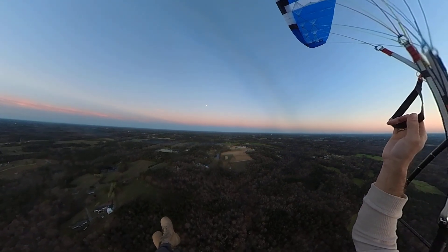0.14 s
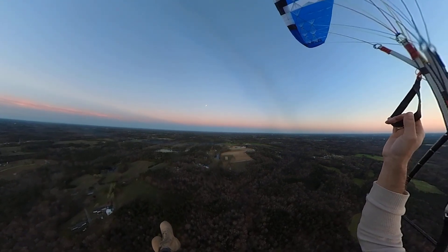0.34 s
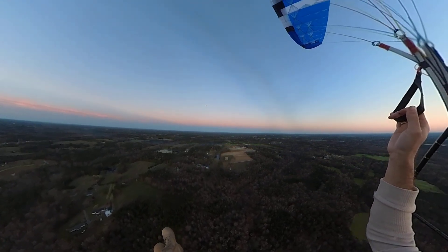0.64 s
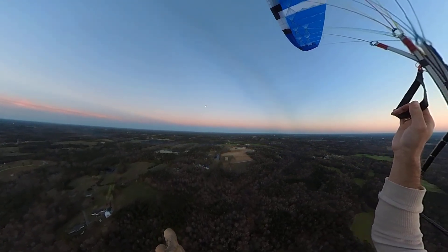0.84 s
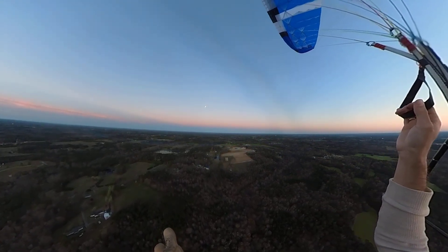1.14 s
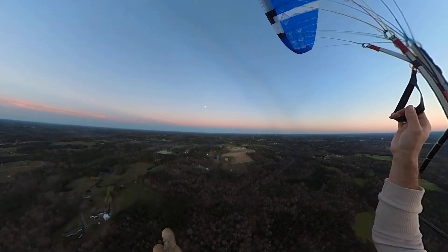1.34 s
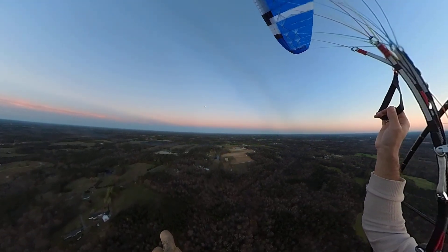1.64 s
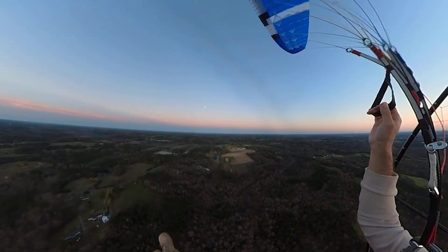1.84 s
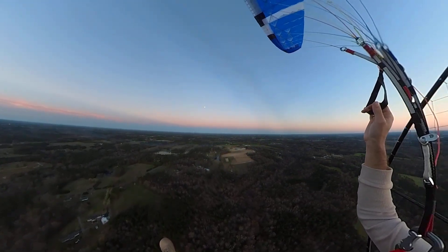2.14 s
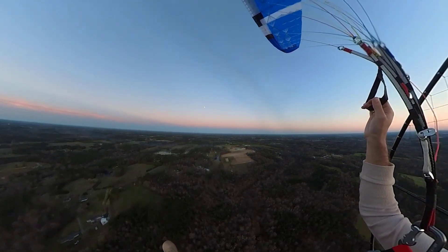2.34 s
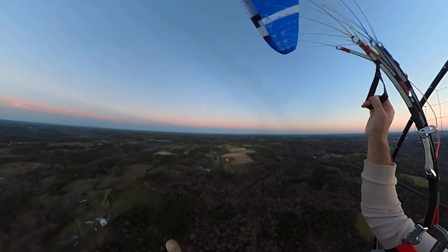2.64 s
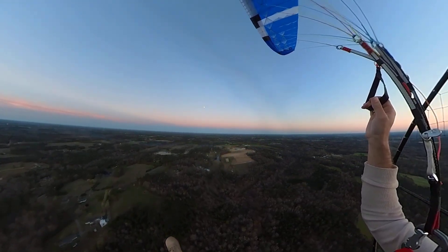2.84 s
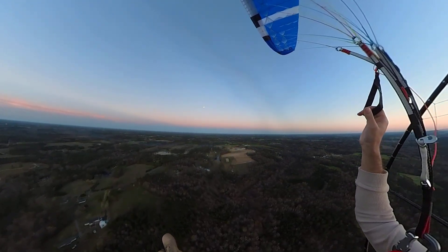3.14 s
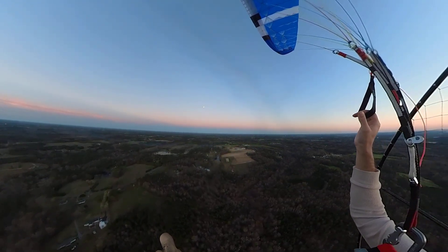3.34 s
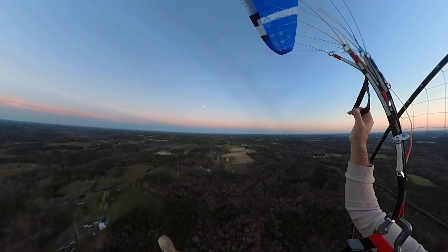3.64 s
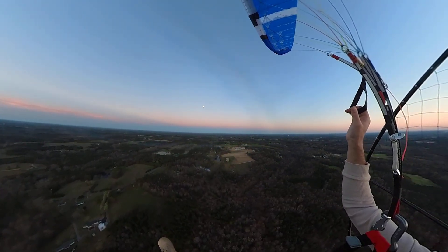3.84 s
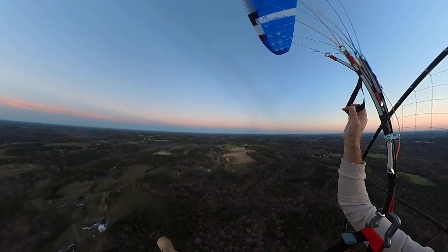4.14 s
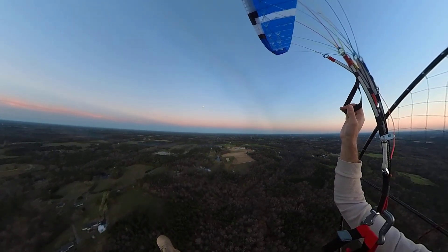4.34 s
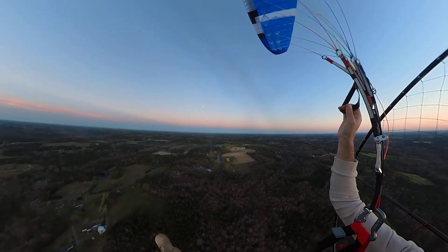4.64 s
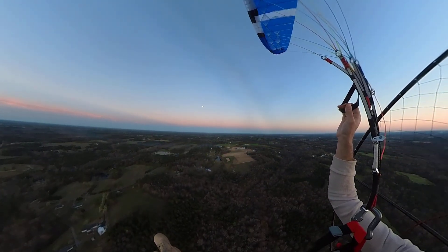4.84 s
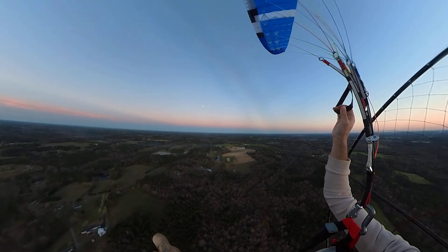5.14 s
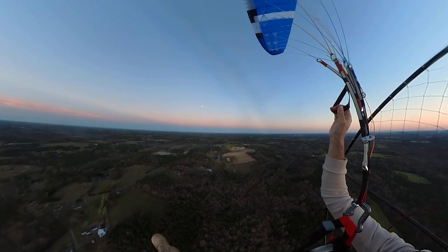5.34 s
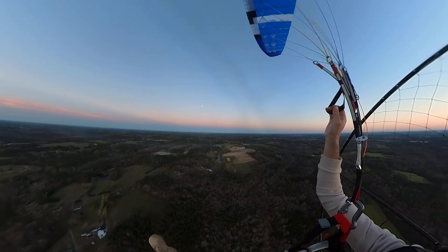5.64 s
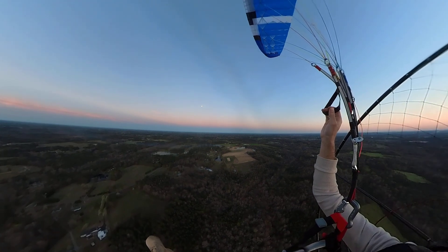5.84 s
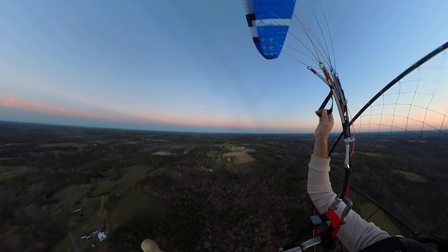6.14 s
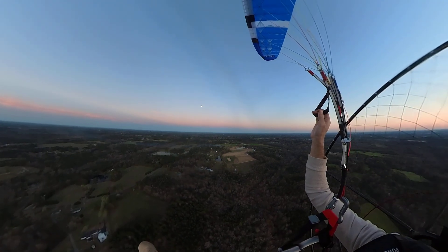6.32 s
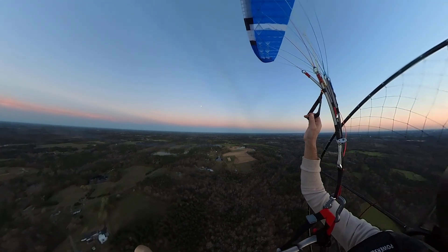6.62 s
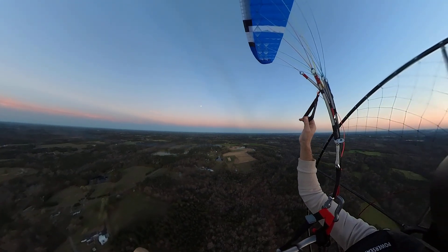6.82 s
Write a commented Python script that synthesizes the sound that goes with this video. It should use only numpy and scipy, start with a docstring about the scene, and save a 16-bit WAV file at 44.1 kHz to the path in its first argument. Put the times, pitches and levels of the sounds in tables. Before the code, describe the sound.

Close outdoor sound from the pilot's seat of an electric powered paraglider, dry and without echo. From 0 s a loud three-blade propeller drones, a low hum near 75 Hz with buzzing overtones and a fast throb of about 25 beats a second. Around it the wake roars, with soft pulsing swish and thin hiss. The airflow swells toward 1.5 s while low buffeting grows. Between 1.3 and 1.75 s the motor eases and the pitch slides down by about two semitones; around 1.6 s a very short rasp of wind brightens and turns hollow as the bass drops out. From 1.8 s the cruise drone is steady, with slight flutter and faint singing tones in the wake. At about 5.7 to 6.0 s the bass thins again beneath a hollow, lumpy rush with barely audible high ticks. Full bass then returns, briefly heavier, and the steady drone continues to the end, near 7 s.

```python
"""Open air, from the pilot's seat of an electric paramotor: a three-blade propeller hums and throbs once a
turn as a sum of shaft harmonics, and slows to cruise between 1.3 and 1.75 s. Its wake roars as shaped noise,
swelling in one gust; a fine hiss is gated by the pressure waves, most sharply once a turn, over low buffeting.
Twice the bass thins out briefly: first under a short rasp of swept noise, later under a hollow roar of
noise surges with faint ringing ticks."""
import sys
import numpy as np
from scipy import signal
from scipy.fft import rfft, irfft, next_fast_len
from scipy.io import wavfile
from scipy.ndimage import map_coordinates

SR = 44100
rng = np.random.default_rng(int(sys.argv[2]) if len(sys.argv) > 2 else 0)


def output_pcm(signal):
    """Save a mono or channel-first signal as 16-bit PCM at the path in sys.argv[1].

    Samples are clipped to [-1, 1] before scaling.
    """
    pcm = np.clip(np.atleast_2d(signal).T, -1, 1) * 32767
    wavfile.write(sys.argv[1], SR, np.round(pcm).astype(np.int16))


N = 307818


def amp(db):
    """Logarithmic level: decibels to amplitude gain."""
    return 10 ** (np.asarray(db) / 20)


def unit(x):
    """Power normalisation: scales to rms 1."""
    return x / np.sqrt(np.mean(x ** 2) + 1e-20)


def curves(rows):
    """Linear interpolation: one value per sample for each column after the time."""
    seconds, *columns = np.transpose(rows)
    return [np.interp(np.arange(N) / SR, seconds, column) for column in columns]


def wobble(rate):
    """Band-limited fluctuation: a smooth random curve with rate knots a second."""
    knots = rng.standard_normal(int(N * rate / SR) + 4)
    return map_coordinates(knots, [np.arange(N) * rate / SR])


def ramp(start, length):
    """Linear transition: rises from 0 to 1 over length seconds."""
    return np.clip((np.arange(N) / SR - start) / length, 0, 1)


def surge(peak, rise, fall):
    """Exponential growth and decay: reaches 1 at the peak time, with time constants in seconds."""
    t = np.arange(N) / SR - peak
    return np.exp(-np.maximum(-t / rise, t / fall))


def filtered(x, response):
    """Linear filtering: multiplies the spectrum by a response of frequency."""
    size = next_fast_len(N + 8192)
    return irfft(rfft(x, size) * response(np.fft.rfftfreq(size, 1 / SR)), size)[:N]


def noise(spectrum, gate=1):
    """Amplitude-modulated random noise, coloured by (frequency, level) points and scaled to rms 1."""
    hz, db = np.transpose(spectrum)
    colour = lambda f: amp(np.interp(np.log(f + 1), np.log(hz), db, right=-120))
    return unit(filtered(gate * rng.standard_normal(N), colour))


def dulled(x, edge_hz):
    """Low-pass filtering: removes the top above edge_hz and scales to rms 1."""
    return unit(filtered(x, lambda hz: 1 / (1 + (hz / edge_hz) ** 6)))


def swept(x, centre_hz, octaves):
    """Moving resonance: a log-frequency bell slides over the noise, its level compensated."""
    hz, t, z = signal.stft(x, SR, nperseg=512)
    centre = np.interp(t, np.arange(N) / SR, centre_hz)
    gain = np.exp(-0.5 * (np.log2((hz[:, None] + 1) / centre) / octaves) ** 2)
    mean_power = np.mean(np.abs(z) ** 2, axis=1, keepdims=True)
    passed_share = np.sum(mean_power * gain ** 2, axis=0) / mean_power.sum()
    return signal.istft(z * gain / np.sqrt(passed_share), SR, nperseg=512)[1][:N]


CRUISE_HZ, HIGH_HZ = 22.99, 25.82  # shaft turns a second at cruise and at high power
EASE_START_S, EASE_S, UNDERSHOOT_HZ, SETTLE_S = 1.275, 0.475, 0.18, 0.1


def shaft_speed():
    """Rotor deceleration: slows ever faster, dips just under cruise speed, then relaxes exponentially."""
    t = np.arange(N) / SR - EASE_START_S
    drop_hz = HIGH_HZ - CRUISE_HZ + UNDERSHOOT_HZ
    slowing = HIGH_HZ - drop_hz * np.clip(t / EASE_S, 0, 1) ** 2
    settling = UNDERSHOOT_HZ * (1 - np.exp(-np.maximum(t - EASE_S, 0) / SETTLE_S))
    return slowing + settling


def power_of(speed):
    """Motor power inferred linearly from shaft speed: 0 at cruise, 1 at high power."""
    return np.clip((speed - CRUISE_HZ) / (HIGH_HZ - CRUISE_HZ), 0, 1)


START_TURN = 0.828  # shaft position at time zero [turns]


def shaft_angle(speed, wander, jitter):
    """Phase is integrated speed [rad]: the load wanders slowly and uneven inflow nudges each passage."""
    turned = 2 * np.pi * (START_TURN + np.cumsum(speed) / SR)
    return turned + wander * wobble(3) + jitter * wobble(30)


def gust_swell():
    """Exponential gust: builds slowly at high power and dies as the motor eases off."""
    return surge(peak=1.5, rise=0.55, fall=0.38)


# Multiples of the shaft speed: every third is a blade tone, other whole ones come from unequal blades;
# a stray tone just under the fifteenth makes it beat: order [cycles per turn]
HARMONIC_ORDERS = [*range(1, 13), 14.5, *range(15, 55, 3), 56, *range(57, 73, 3)]
# Strength of each order, relative to tone_db: (level at high power [dB], level at cruise [dB])
HARMONIC_LEVELS = [(-42, -54), (-37.5, -58), (-23, -24.5), (-35.5, -31), (-55.5, -49), (-45, -31),
                   (-39, -38.5), (-47, -42), (-37, -50.5), (-38.5, -44.5), (-46, -51), (-40.5, -35.5),
                   (-61.5, -43.5), (-33.5, -34.5), (-37, -40), (-45, -44.5), (-39.5, -42.5), (-41.5, -41.5),
                   (-43, -45), (-47.5, -52), (-46.5, -51.5), (-45.5, -49.5), (-50.5, -53.5), (-63.5, -70),
                   (-54.5, -55.5), (-54, -54.5), (-57, -68), (-65.5, -63.5), (-59, -74), (-57, -68),
                   (-64.5, -61.5), (-59, -66), (-66, -70), (-65, -69.5)]
# Tones that stand out of the hum while the bass is thin: {order: lift [dB]}
THIN_BASS_LIFTS = {9: 16, 12: 2.9, 15: 4.4, 21: 6.3, 48: 11, 51: 2.8, 66: 4.8, 72: 7.7}
# Tones that swell with the gust and carry the downward glide: {order: lift [dB]}
GUST_TONE_LIFTS = {15: 4, 18: 1.7, 24: 0.91}
FLUTTER_CALM = 0.81  # share of the flutter that high power takes away


def propeller(angle, power, flutter_db, skew, bend, uneven, tone_db, smear, scatter_order):
    """Harmonic synthesis of blade pressure: a lopsided swell per blade, with a buzz of higher orders on top."""
    thin = sum(thin_spell(start, end) for start, end, *_ in BASS_SPELLS)
    gust = gust_swell()
    pressure = np.zeros(N)
    for order, (high_db, cruise_db) in zip(HARMONIC_ORDERS, HARMONIC_LEVELS):
        # long waves add up to a peaked swell; shorter ones get phases that bend with order
        # and scatter at random, and their levels flutter
        scatter = min(order / scatter_order, 2)
        phase = skew - bend * np.log(order) - smear * max(order - 9, 0) ** 2
        phase += scatter ** 2 * rng.standard_normal()
        between_blades = order % 3 > 0
        phase += uneven * between_blades  # the blades differ in timing as well as in strength
        flutter = flutter_db * min(scatter, 1) * (1 - FLUTTER_CALM * power) * wobble(15)
        level_db = tone_db + cruise_db + power * (high_db - cruise_db)
        level_db = level_db + thin * THIN_BASS_LIFTS.get(order, 0) + gust * GUST_TONE_LIFTS.get(order, 0)
        pressure -= amp(level_db + flutter) * np.sin(order * angle + phase)
    return pressure


def pumping(pressure, smooth_hz, drive, lean):
    """Pressure gradients drive the air to and fro, harder one way; the strongest pushes saturate. Rms 1."""
    slope = unit(filtered(np.gradient(pressure), lambda hz: 1 / (1 + (hz / smooth_hz) ** 4)))
    return unit(np.tanh(drive * np.abs(slope + lean)))


STRONG_BLADE_TURN = 0.34  # shaft position of the harder puff [turns]


def strong_blade(angle, sharpness, scatter_db):
    """Periodic modulation: once a turn one blade throws a harder puff, never twice the same."""
    puff = np.exp(sharpness * (np.cos(angle - 2 * np.pi * STRONG_BLADE_TURN) - 1))
    return puff * amp(scatter_db * wobble(29))


# Spectral shapes of the three airflow bands: (frequency [Hz], relative density [dB per Hz])
WAKE_SPECTRUM = [(40, -11.5), (80, 0.3), (160, -5), (260, -5), (420, -11), (700, -13), (1100, -19),
                 (1600, -24.5), (2500, -34), (4000, -53)]
SWISH_SPECTRUM = [(400, -19.5), (900, 1), (1500, -1.5), (2100, -7.5), (2700, -6), (3300, -15), (4000, -24),
                  (4900, -33.5), (6000, -50)]
HISS_SPECTRUM = [(3500, -28.5), (4900, -25), (5500, -13), (6200, -5), (7000, -0.5), (7900, -2), (8400, -10),
                 (9000, -22.5), (9400, -54.5)]
# what the gust and the high power add to each band
WAKE_GUST_DB, SWISH_GUST_DB, HISS_GUST_DB = 3, 7, 5
WAKE_POWER_DB, SWISH_POWER_DB, HISS_POWER_DB = 0.3, -2.5, -2.5
BODY_HZ, BODY_POWER_DB = 302, -2  # at high power the low end of the wake recedes


def airflow(push, accent, power, wake_db, swish_db, hiss_db, wake_depth, swish_floor, hiss_floor,
            puff_db, swish_accent, hiss_accent):
    """Modulated turbulence noise of the wake; its upper bands come in puffs, with every push of air."""
    gust, eddies = gust_swell(), wobble(11)
    wake_gain = amp(wake_db + WAKE_GUST_DB * gust + WAKE_POWER_DB * power + 0.79 * wobble(8))
    swish_gain = amp(swish_db + SWISH_GUST_DB * gust + SWISH_POWER_DB * power + 1.1 * eddies)
    hiss_gain = amp(hiss_db + HISS_GUST_DB * gust + HISS_POWER_DB * power + 0.53 * eddies)
    puffs = unit(push * amp(puff_db * wobble(90)))  # no two puffs are equally strong
    wake = wake_gain * noise(WAKE_SPECTRUM, 1 + wake_depth * puffs)
    body = filtered(wake, lambda hz: 1 / (1 + (hz / BODY_HZ) ** 4))
    wake = wake + (amp(BODY_POWER_DB * power) - 1) * body
    swish = swish_gain * noise(SWISH_SPECTRUM, swish_floor + puffs + swish_accent * accent)
    hiss = hiss_gain * noise(HISS_SPECTRUM, hiss_floor + puffs + hiss_accent * accent)
    return wake + swish + hiss


# Spectral shape of the low buffeting: (frequency [Hz], relative density [dB per Hz])
BUFFET_SPECTRUM = [(10, -19.5), (22, -0.5), (32, -1.5), (48, 1), (70, -10), (110, -2), (250, -42.5)]
# Course of the buffeting, relative to level_db: (time [s], level [dB])
BUFFET_COURSE = [(0.0, -49.5), (1.37, -35), (4.16, -43), (5.22, -39), (5.43, -36.5), (5.6, -37.5)]


def wind(level_db, gust_db):
    """Low-frequency turbulence noise: the airstream buffets with a slowly varying strength."""
    strength_db, = curves(BUFFET_COURSE)
    return amp(level_db + strength_db) * unit(amp(gust_db * wobble(5.5)) * noise(BUFFET_SPECTRUM))


# Narrow resonances that sing in the wake: (centre [Hz], width [Hz], level [dB])
WAKE_RESONANCES = [(407.6, 43, -55.5), (742.6, 20, -52.5), (1161, 29, -56.5)]


def rings():
    """Resonant filtering: noise through narrow peaks makes unsteady tones."""
    tones = np.zeros(N)
    for centre, width, db in WAKE_RESONANCES:
        peak = lambda hz: 1 / (1 + (2 * (hz - centre) / width) ** 2)
        tones += amp(db) * unit(filtered(rng.standard_normal(N), peak))
    return tones


# Spectral shape of the rasp: (frequency [Hz], relative density [dB per Hz])
RASP_SPECTRUM = [(120, -20.5), (330, 0), (700, 2), (1200, -3), (1500, -5), (1900, -21.5), (3500, -45)]
# One gust whose resonance climbs and falls as it dies: (time [s], level [dB], centre [Hz])
RASP_COURSE = [(1.5, -53, 300), (1.55, -32, 350), (1.567, -32, 600), (1.578, -26.5, 760),
               (1.603, -25, 1050), (1.616, -36, 780), (1.636, -24, 620), (1.653, -26.5, 524),
               (1.677, -34.5, 500), (1.78, -56.5, 480)]


def rasp(gate, octaves):
    """Time-varying resonance: one short gust of noise brightens, then turns hollow."""
    level_db, centre_hz = curves(RASP_COURSE)
    return amp(level_db) * swept(noise(RASP_SPECTRUM, gate), centre_hz, octaves)


# Spells of thin bass: (start [s], end [s], bass change [dB], bass overshoot on return [dB])
BASS_SPELLS = [(1.572, 1.612, -24, -2), (5.662, 6.003, -16, 5)]
BASS_FADE_S, BASS_RETURN_S, OVERSHOOT_S = 0.027, 0.03, 0.055
BASS_DB = 1.54  # standing bass lift, to which the changes add
TREBLE_DIP_DB, TREBLE_HZ = -1, 5000


def thin_spell(start, end):
    """Trapezoidal envelope: 1 while the bass is thin, 0 outside."""
    return ramp(start, BASS_FADE_S) * (1 - ramp(end, BASS_RETURN_S))


def thinned(x, corner_hz):
    """Time-varying shelving: in short spells the bass drops and the top dulls; the bass level jolts on return."""
    bass = filtered(x, lambda hz: 1 / (1 + (hz / corner_hz) ** 3))
    treble = x - filtered(x, lambda hz: 1 / (1 + (hz / TREBLE_HZ) ** 8))
    bass_db, treble_db = BASS_DB, 0
    for start, end, depth_db, overshoot_db in BASS_SPELLS:
        spell = thin_spell(start, end)
        jolt = ramp(end, BASS_RETURN_S) * (1 - ramp(end + BASS_RETURN_S, OVERSHOOT_S))
        bass_db = bass_db + depth_db * spell + overshoot_db * jolt
        treble_db = treble_db + TREBLE_DIP_DB * spell
    return x + (amp(bass_db) - 1) * bass + (amp(treble_db) - 1) * treble


# Spectral shape of the roar: (frequency [Hz], relative density [dB per Hz])
ROAR_SPECTRUM = [(70, -42), (160, -0.5), (330, 1), (600, -2), (1100, -9.5), (1700, -17), (2800, -22.5),
                 (4500, -36)]
# Swells of the roar: (peak time [s], level [dB], rise [s], fall [s], upper edge [Hz])
ROAR_SWELLS = [(5.795, -33.5, 0.015, 0.019, 600), (5.82, -29, 0.097, 0.15, 3300),
               (5.865, -28, 0.013, 0.041, 600), (5.965, -23, 0.041, 0.049, 750),
               (6.005, -26.5, 0.12, 0.035, 3400)]


def roar(gate, churn_db):
    """Superposed noise surges: two broad swells with three hollow lumps in them, slightly churning."""
    swells = np.zeros(N)
    for peak_s, db, rise, fall, edge_hz in ROAR_SWELLS:
        swells += amp(db) * surge(peak_s, rise, fall) * dulled(noise(ROAR_SPECTRUM, gate), edge_hz)
    return swells * amp(churn_db * wobble(70))


def brief_dip(depth_db, fall_s, recover_s):
    """Transient attenuation: the airflow noise dips for a moment as the long spell of thin bass sets in."""
    start = BASS_SPELLS[-1][0]
    return amp(depth_db * surge(start + BASS_FADE_S, fall_s, recover_s))


# Faint ticks during the roar, relative to level_db: (time [s], peak level [dB])
TICK_TIMES = [(5.7019, -49), (5.7159, -41), (5.7329, -38), (5.743, -36), (5.7877, -36), (5.8202, -40),
              (5.8306, -36), (5.875, -37), (5.8894, -44), (5.9184, -39), (5.9504, -36), (5.961, -38),
              (5.9754, -49), (6.0057, -37), (6.02, -38), (6.0414, -44), (6.0477, -44)]
# Spectral shape of their grit: (frequency [Hz], relative density [dB per Hz])
TICK_SPECTRUM = [(4900, -46.5), (5900, -7), (6600, -8), (7300, -2.5), (7900, -0.5), (8400, -12),
                 (8900, -22.5)]
TICK_HZ = 7860  # mean pitch of the ring


def ticks(level_db, swell_s, grit_db):
    """Short damped rings with some grit, each swelling and dying in a few milliseconds."""
    out, t = np.zeros(N), np.arange(SR // 50) / SR
    grit = amp(grit_db) * noise(TICK_SPECTRUM)
    envelope = (t / swell_s * np.exp(1 - t / swell_s)) ** 2
    for start_s, db in TICK_TIMES:
        first = round(start_s * SR)
        span = slice(first, first + len(t))
        ring = np.sqrt(2) * np.sin(2 * np.pi * TICK_HZ * rng.normal(1, 0.022) * t)
        out[span] += amp(db + level_db) * envelope * (ring + grit[span])
    return out


def scene():
    """Superposition: propeller, wake, wind, surges and ticks add up in one channel."""
    speed = shaft_speed()
    power = power_of(speed)
    angle = shaft_angle(speed, wander=0.016, jitter=0.008)
    hum = propeller(angle, power, flutter_db=2.0, skew=1.884, bend=2.32, uneven=-2.68, tone_db=1.0,
                    smear=0.222, scatter_order=32)
    push = pumping(hum, smooth_hz=221, drive=0.98, lean=-0.32)
    accent = strong_blade(angle, sharpness=16, scatter_db=2)
    air = airflow(push, accent, power, wake_db=-31.5, swish_db=-52.0, hiss_db=-65.0, wake_depth=0.73,
                  swish_floor=0.34, hiss_floor=2.5, puff_db=1.6, swish_accent=0.66, hiss_accent=2.1)
    air = air + (1 - power) * rings()  # the wake sings most at cruise
    air = air * brief_dip(depth_db=-2.0, fall_s=0.011, recover_s=0.07)
    buffet = wind(level_db=2.5, gust_db=-0.8)
    flight = thinned(hum + air + buffet, corner_hz=120)
    surges = rasp(2.0 + push, octaves=0.66) + roar(2.0 + push, churn_db=0.2)
    spits = ticks(level_db=-12.5, swell_s=0.0011, grit_db=-0.5)
    return (flight + surges + spits)[None]


TOP_HZ = 9216  # upper band limit


def record(dry):
    """Band-pass filtering: a gentle cut below hearing and a steep one above the band limit."""
    band = lambda hz: (1 - 1 / (1 + (hz / 18) ** 6)) / (1 + (hz / TOP_HZ) ** 70)
    return filtered(dry[0], band)[None]


dry = scene()
out = record(dry)
output_pcm(out)
```